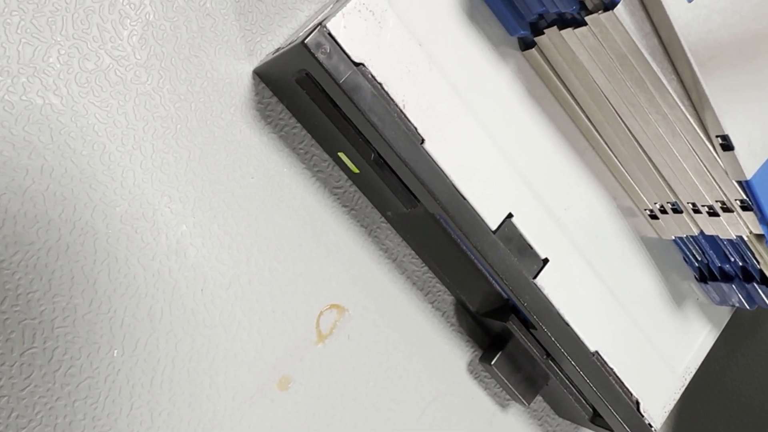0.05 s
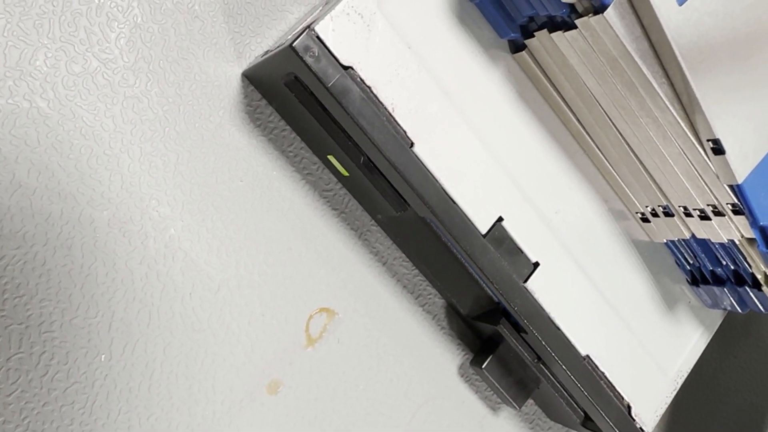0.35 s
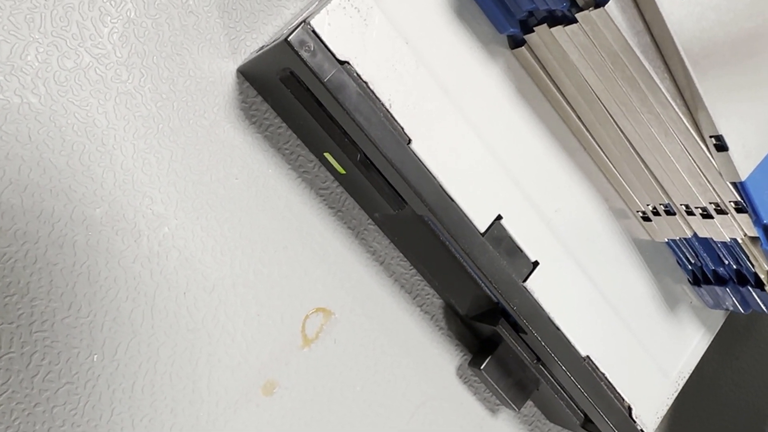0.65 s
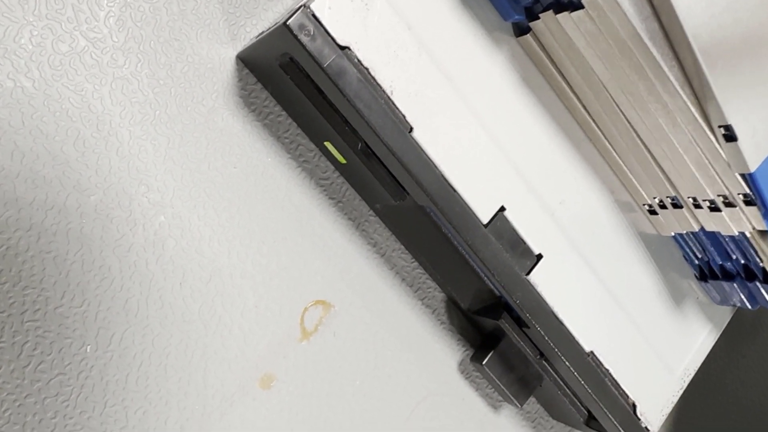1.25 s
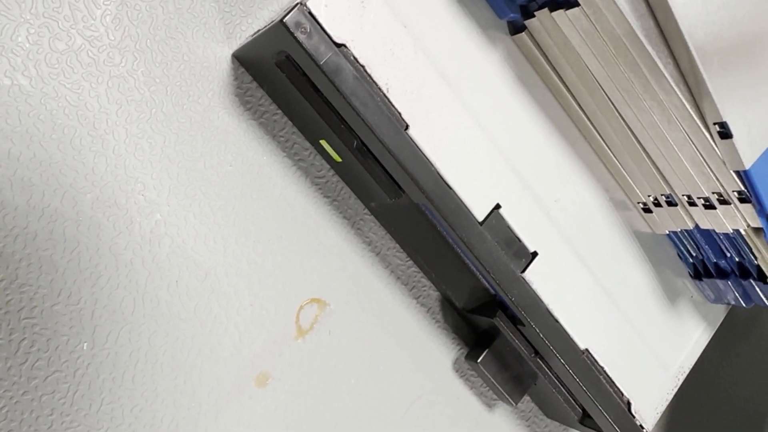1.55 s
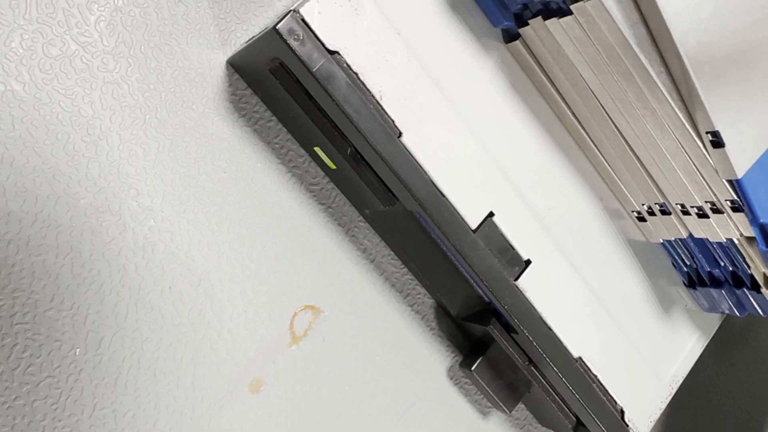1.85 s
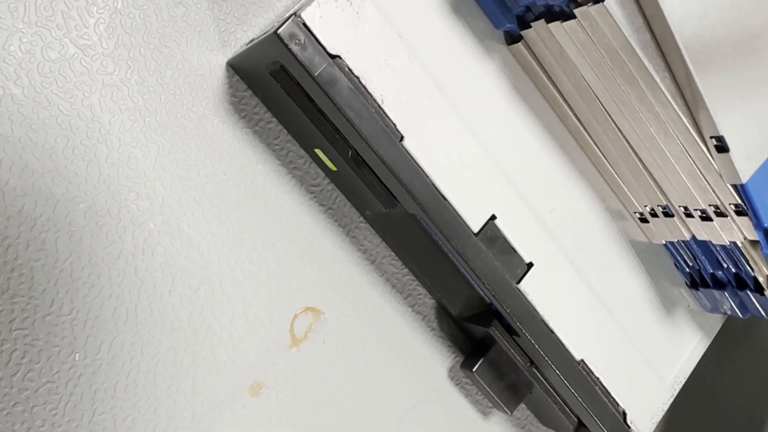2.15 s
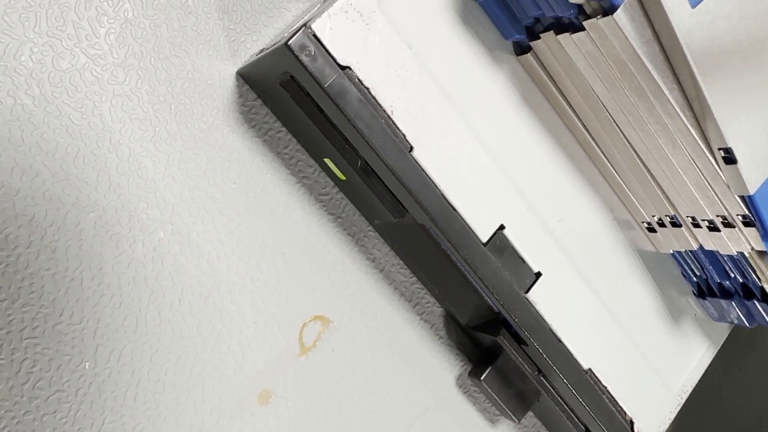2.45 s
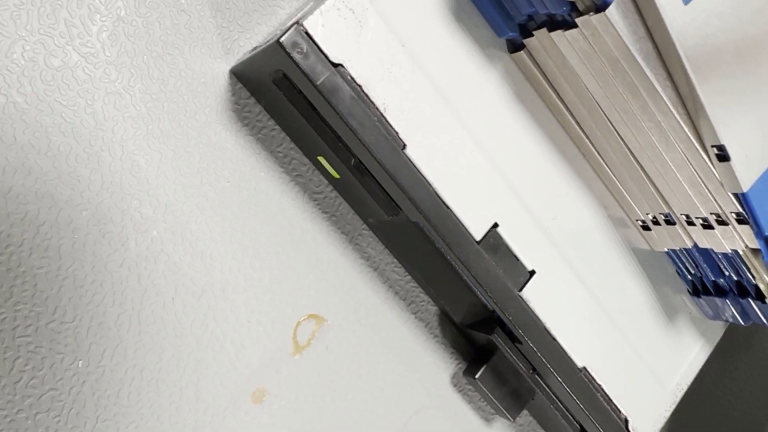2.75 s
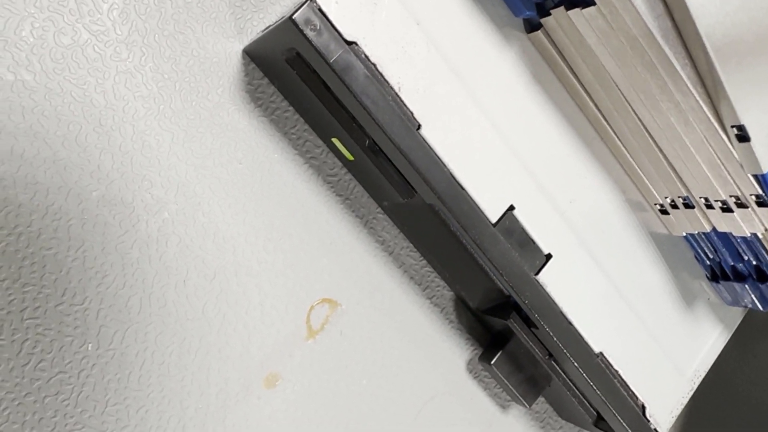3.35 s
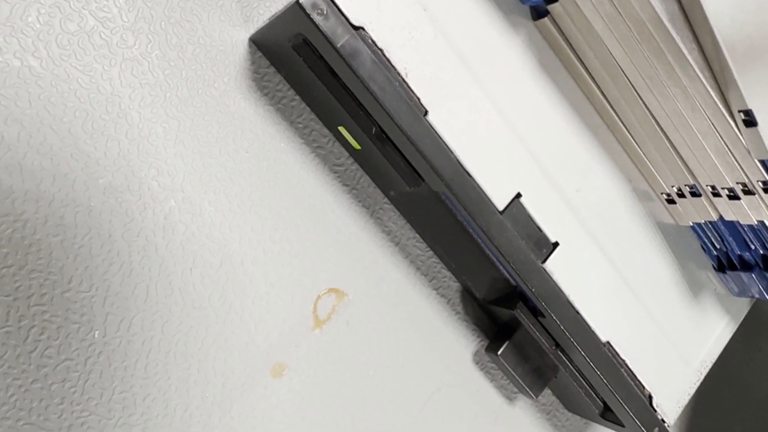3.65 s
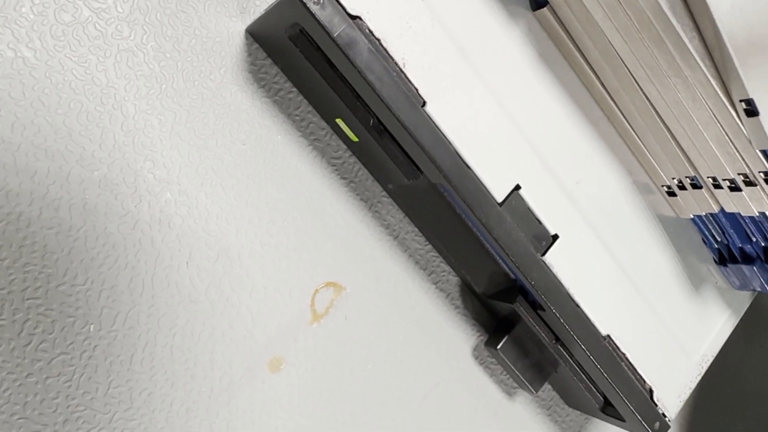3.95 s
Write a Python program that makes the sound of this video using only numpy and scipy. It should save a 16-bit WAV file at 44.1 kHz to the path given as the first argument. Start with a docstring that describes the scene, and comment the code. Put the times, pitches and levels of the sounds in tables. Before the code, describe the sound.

A floppy disk drive starts with two short, groaning bursts, then grinds on in quick surges, with irregular sharp clicks and brief ratcheting catches. It is close to the microphone in a quiet, dry room.

```python
"""In a quiet, dry room, a small plastic drive mechanism runs close by.
It makes two short, groaning starts, then grinds on in about four surges a second. Friction shakes the
housing, which rasps at the pitches where it likes to ring. Again and again the sliding part catches
and chatters free, and hard edges click. Soft room noise and a faint hum lie below."""
import sys
import numpy as np
from scipy import signal
from scipy.fft import rfft, irfft, next_fast_len
from scipy.io import wavfile
from scipy.ndimage import uniform_filter1d

SR = 44100
rng = np.random.default_rng(int(sys.argv[2]) if len(sys.argv) > 2 else 0)


def int16_out(signal):
    """Quantize to a 16-bit WAV file."""
    q = np.round(np.clip(np.atleast_2d(signal).T, -1, 1) * 32767)
    wavfile.write(sys.argv[1], SR, q.astype(np.int16))


N = 176400
T = np.arange(N) / SR
SIZE = next_fast_len(N + SR // 2)   # spare room for ringing to die away
HZ = np.maximum(np.fft.rfftfreq(SIZE, 1 / SR), 1)

# The tone of the room noise. Each row: frequency in Hz, relative level in dB.
ROOM_TONE = [(30, -6), (60, 5), (800, 5), (2300, -32), (16000, -45)]
# Where the housing rings. Each row: frequency in Hz, width in Hz, boost in dB.
RESONANCES = [(397.6, 165, 10), (635, 45, 8.5), (693, 49, 9), (776, 73, 5), (1249, 138, 11),
              (2266, 280, 13), (3300, 280, 10), (3647, 220, 11.5), (6383, 107, 12), (7790, 270, 1.5),
              (8800, 130, -0.5), (16200, 380, -5)]
# The tones of four forces that shake the housing. Each row: frequency in Hz, relative level in dB.
GROWL_TONE = [(265, -15.5), (350, -3.5), (520, -7), (650, 1), (900, -0.5), (2200, -46)]
RASP_TONE = [(500, -30), (1150, -5.5), (1500, -5), (1950, 4), (3650, -11.5), (4200, -15), (7000, -38)]
KNOCK_TONE = [(450, -15.5), (900, 0.5), (1500, -0.5), (2000, 11), (3700, -10.5), (6000, -26.5)]
SNAP_TONE = [(2500, -26.5), (4600, 1), (6800, 0), (8700, 10), (10900, -11.5), (12500, -8), (14700, 1.5),
             (16000, -1.5)]
# The short groans. Each row: start in seconds, length in seconds, starting pitch in Hz, level in dB.
GROAN_EVENTS = [(0.005, 0.057, 725, -47), (0.062, 0.035, 642, -43), (0.269, 0.045, 732, -42.5),
                (2.87, 0.079, 700, -40.5), (3.132, 0.08, 698, -40.5)]
# A hard edge clicks once. Each row: start in seconds, level in dB.
EDGE_CLICKS = [(0.1925, -45), (0.6265, -42), (0.789, -29.5), (0.8195, -24.5), (1.0925, -27), (1.2125, -25),
               (1.459, -29), (1.5385, -29), (1.6095, -27.5), (2.3605, -25), (2.892, -31), (2.9675, -35),
               (3.1305, -28), (3.302, -33.5), (3.3735, -33), (3.388, -28.5)]
# The sliding part catches. Each row: start in seconds, length in seconds, knock in dB, snap in dB.
CATCH_EVENTS = [(0.25, 0.0034, -25, -29.5), (0.548, 0.0086, -43.5, -55), (0.6929, 0.0063, -23.5, -28),
                (1.049, 0.0064, -36, -49), (1.1727, 0.0086, -28, -28.5), (1.251, 0.0031, -31, -31),
                (1.316, 0.0066, -31.5, -36.5), (1.373, 0.0084, -36.5, -40.5), (1.466, 0.0074, -29, -27),
                (1.552, 0.022, -31, -32.5), (1.788, 0.014, -25.5, -29.5), (1.862, 0.014, -33.5, -36.5),
                (1.963, 0.014, -28, -34), (2.0838, 0.011, -26, -24.5), (2.1165, 0.0076, -31, -30.5),
                (2.157, 0.0051, -32.5, -32.5), (2.187, 0.0046, -30, -31.5), (2.2175, 0.0064, -33.5, -32),
                (2.396, 0.0094, -27, -29), (2.4626, 0.0052, -33, -34.5), (2.637, 0.0069, -36, -32),
                (3.207, 0.0089, -26.5, -31), (3.7278, 0.0097, -30.5, -29)]
# How hard the drive pushes. Each row: time in seconds, level in dB.
DRIVE_LEVELS = [(0, -42), (0.085, -45.5), (0.125, -61.5), (0.245, -60), (0.26, -43), (0.49, -45),
                (0.61, -59.5), (0.685, -63.5), (0.71, -42.5), (0.9, -42), (1.07, -46), (1.2, -39.5),
                (1.44, -46.5), (1.52, -40.5), (1.75, -43.5), (1.93, -41.5), (2.05, -45), (2.12, -39.5),
                (2.31, -43.5), (2.41, -38.5), (2.58, -43.5), (2.65, -38.5), (2.845, -42.5), (2.9, -39.5),
                (3.09, -42.5), (3.15, -39.5), (3.32, -43), (3.42, -41), (3.71, -45.5), (3.79, -41.5),
                (4.0, -43)]
# How rough the contact is. Each row: time in seconds, extra rasp in dB, extra grit in dB.
ROUGHNESS = [(.45, 2, -4.5), (.8, 3.5, 2), (2.2, 1.5, 1), (2.8, 0, 0), (3.75, 3, 0.5)]
# Which way the sound leans. Each row: frequency in Hz, left minus right in dB.
BALANCE = [(200, -1), (900, 4.5), (2200, -1), (3000, 0)]
# How wide the sound is. Each row: frequency in Hz, gain of the side signal in dB.
STEREO_WIDTH = [(400, -13.5), (900, -9), (1800, -35), (2600, -7.5), (12000, -15)]

USUAL_DRIVE_DB, STALL_DB = -43, -49
GRIT_FOLLOWS = 1.44   # dB of grit and crackle for each dB of push
JUDDER_HZ = (3.9, 54.5)   # slowest and fastest shaking of the contact
TOP_HZ = 15900


def from_db(db):
    """Turn decibels into a number to multiply by."""
    return 10 ** (np.asarray(db) / 20)


def rms_one(x):
    """Scale a signal to an average power of one."""
    return x / np.sqrt(np.mean(np.abs(x) ** 2) + 1e-20)


def in_time(rows):
    """Join a table's points with lines, giving each column a value at every sample."""
    times, *columns = np.transpose(rows)
    return [np.interp(T, times, column) for column in columns]


def over_hz(points):
    """Join a table's points, giving a value at every frequency."""
    hz, values = np.transpose(points)
    return np.interp(np.log(HZ), np.log(hz), values)


def wobble(low_hz, high_hz):
    """Random movement between two rates, with a typical size of one."""
    band = 1 / np.sqrt((1 + (low_hz / HZ) ** 4) * (1 + (HZ / high_hz) ** 6))
    return rms_one(irfft(rfft(rng.standard_normal(SIZE)) * band, SIZE)[:N])


def reflections(fade_s):
    """The spectrum of many tiny echoes that fade by 60 dB in the given time."""
    return rms_one(rfft(rng.standard_normal(N) * from_db(-60 * T / fade_s), SIZE))


def room_noise(level_db=-65):
    """A soft, low rush of noise in the room."""
    spectrum = rfft(rng.standard_normal((2, SIZE))) * from_db(over_hz(ROOM_TONE))
    return from_db(level_db) * rms_one(irfft(spectrum, SIZE)[:, :N])


def hum(hz=92, level_db=-73, waver_db=4.5):
    """A faint low tone that wavers in pitch and loudness."""
    tone = np.sqrt(2) * np.sin(2 * np.pi * hz * T + 0.47 * wobble(0.81, 1.7))
    return from_db(level_db + waver_db * wobble(1.6, 17.0)) * tone


def housing(force, tone, low_hz=168):
    """A force with the given tone rings the housing, which is too small to give off much bass."""
    boosts = sum(db / (1 + (2 * (HZ - hz) / width) ** 2) for hz, width, db in RESONANCES)
    gain = rms_one(from_db(over_hz(tone) + boosts) / (1 + (low_hz / (HZ + 10)) ** 2))
    # Shape the filter so that the ringing comes after each push, never before it.
    cepstrum = irfft(np.log(gain), SIZE)
    cepstrum[1:SIZE // 2] *= 2
    cepstrum[SIZE // 2 + 1:] = 0
    return irfft(rfft(force, SIZE) * np.exp(rfft(cepstrum, SIZE)), SIZE)[:, :N]


def groans(sag_hz_per_s=470, octave_db=-8):
    """The rubbing part sticks and slips so fast that it makes tones, which swell, sag and fade."""
    sound, waver_hz = 0, 34 * wobble(*JUDDER_HZ)
    for start, length, hz, db in GROAN_EVENTS:
        age = np.clip(T - start, 0, length)
        phase = 2 * np.pi * np.cumsum(hz - sag_hz_per_s * age + waver_hz) / SR
        swell = np.sqrt(age * (length - age))
        force = swell * (np.sin(phase) + from_db(octave_db) * np.sin(2 * phase))
        sound += from_db(db) * np.sqrt(length * SR / N) * rms_one(housing(force[None], KNOCK_TONE))
    return sound * [[1], [0]]   # in the middle only


def clicks(crackle_per_s=33, crackle_db=-39, decay_s=0.002, pitch_count=40):
    """Hard edges click over a faint crackle that follows the push; each rings at its own pitches."""
    push_db = in_time(DRIVE_LEVELS)[0] - USUAL_DRIVE_DB
    moments = rng.integers(0, N, int(crackle_per_s * N / SR))
    crackle = [(i / SR, crackle_db + GRIT_FOLLOWS * push_db[i] + 2 * rng.standard_normal())
               for i in moments]
    force, t = np.zeros((2, N + SR)), T[:SR // 20]
    for start, db in list(EDGE_CLICKS) + crackle:
        pitches_hz = rng.uniform(1990, TOP_HZ, (pitch_count, 1))
        ring = rng.choice([-1, 1], (2, pitch_count)) @ np.sin(2 * np.pi * pitches_hz * t)
        first = int(start * SR)
        force[:, first:first + len(t)] += from_db(db) * rms_one(ring) * np.exp(-t / decay_s)
    return housing(force[:, :N], SNAP_TONE)


def catches(slips_per_s=360, slip_decay_s=0.003, swell_share=0.18, release_s=0.002):
    """The part catches, then chatters free in quick puffs of friction: a low knock and a high snap."""
    force, t = np.zeros((2, 2, N + SR)), T[:SR // 10] - 1 / 20
    for start, length, knock_db, snap_db in CATCH_EVENTS:
        since_slip = t % (rng.uniform(.8, 1.2) / slips_per_s)
        build_up = np.minimum(t, 0) / (swell_share * length)
        release = np.maximum(t - length, 0) / release_s
        shape = np.exp(build_up - release - since_slip / slip_decay_s)
        puffs = rng.standard_normal((2, 2, len(t))) * shape
        tone_db = 2.5 * rms_one(uniform_filter1d(rng.standard_normal(len(t) // 2 + 1), size=40))
        for _ in range(2):   # even out the noise so each catch rings every resonance, in its own tone
            even = irfft(np.exp(1j * np.angle(rfft(puffs))) * from_db(tone_db), len(t))
            loudness = np.sqrt(np.abs(uniform_filter1d(even ** 2, size=32)) + 1e-18)
            puffs = even / loudness * shape
        puffs *= np.sqrt((length + release_s) * SR / np.sum(puffs ** 2, axis=-1, keepdims=True))
        first = int((start + t[0]) * SR)
        force[..., first:first + len(t)] += puffs * from_db([[[knock_db]], [[snap_db]]])
    knock, snap = force[..., :N]
    return housing(knock, KNOCK_TONE) + housing(snap, SNAP_TONE)


def grains(per_s, spread_db):
    """Tiny random collisions of uneven size."""
    sizes = from_db(spread_db * np.minimum(rng.exponential(1, N), 3))
    return rms_one(sizes * rng.choice([-1, 1], (2, N)) * (rng.random(N) < per_s / SR))


def grinding(growl_db=-42.5, rasp_db=-41.5, grit_db=-49.5):
    """Sliding friction: growl, rasp and fine grit surge with the push and dip as the contact shakes."""
    drive_db, = in_time(DRIVE_LEVELS)
    extra_rasp_db, extra_grit_db = in_time(ROUGHNESS)
    push_db = drive_db - USUAL_DRIVE_DB
    stall_db = .9 * np.minimum(drive_db - STALL_DB, 0)   # a weak push loses even more rasp
    judder = 2 * np.log1p(.85 * np.tanh(wobble(*JUDDER_HZ) / 2))   # deep dips, small peaks
    clumps_db = 3 * np.tanh(wobble(JUDDER_HZ[0], 150))   # the grit comes in quick clumps
    growl_gain = from_db(growl_db + push_db + 1.1 * judder)
    rasp_gain = from_db(rasp_db + extra_rasp_db + push_db + stall_db + 3 * judder)
    grit_gain = from_db(grit_db + extra_grit_db + GRIT_FOLLOWS * push_db + 3 * judder + clumps_db)
    growl = housing(grains(per_s=5000, spread_db=4) * growl_gain, GROWL_TONE)
    rasp = housing(grains(per_s=4000, spread_db=2) * rasp_gain, RASP_TONE)
    grit = housing(grains(per_s=11000, spread_db=3) * grit_gain, SNAP_TONE)
    return growl + rasp + grit


def scene():
    """Mix it all: the treble rings on in the small parts, and close echoes spread it left and right."""
    treble = HZ / (HZ - 2500j)   # passes what lies above about 2500 Hz
    ringing = from_db(-6.5) * reflections(fade_s=.07) * treble
    background = rfft(room_noise() + hum(), SIZE)
    mechanism = rfft(grinding() + catches() + groans() + clicks(), SIZE)
    # Two rows: the middle, shared by both ears, and the spread, which makes them differ.
    middle, spread = background + mechanism * (1 + ringing)
    near_echoes = 1j * middle * rms_one(reflections(fade_s=.004).real) * np.abs(treble) ** 2
    side = (spread + near_echoes) * from_db(over_hz(STEREO_WIDTH))
    lean = from_db(over_hz(BALANCE) / 2)
    return irfft(np.array([middle * lean + side, middle / lean - side]), SIZE)[:, :N]


def record(dry):
    """Cut off the very highest treble steeply."""
    return signal.sosfilt(signal.ellip(10, .2, 70, TOP_HZ, fs=SR, output="sos"), dry)


dry = scene()
out = record(dry)
int16_out(out)
```